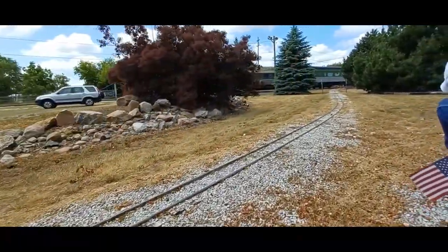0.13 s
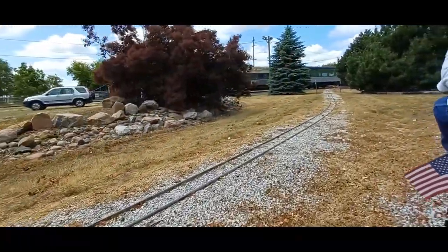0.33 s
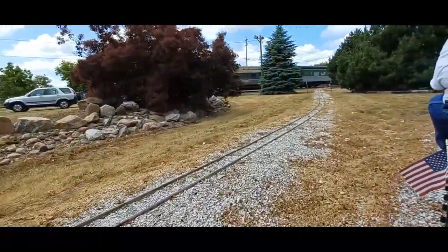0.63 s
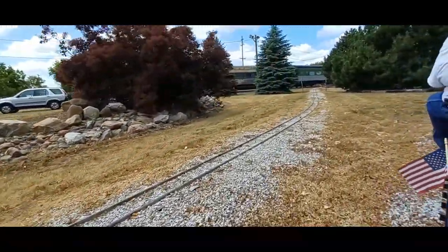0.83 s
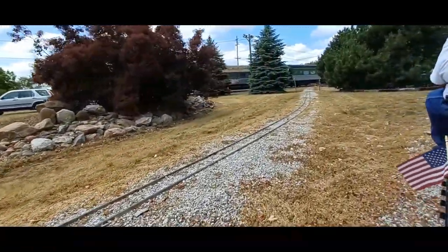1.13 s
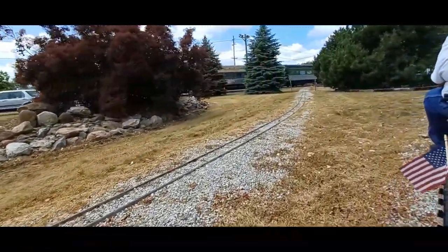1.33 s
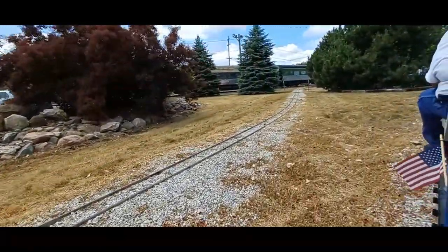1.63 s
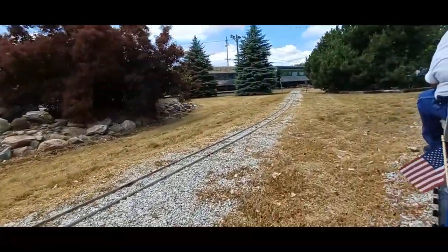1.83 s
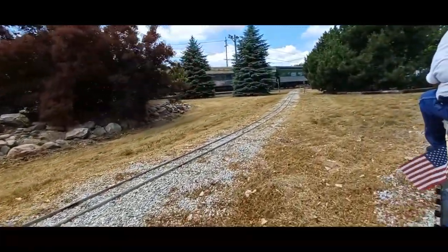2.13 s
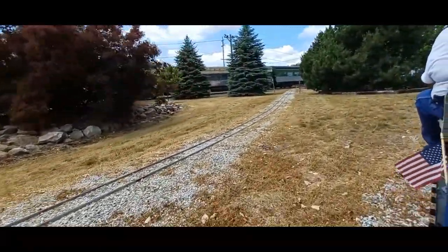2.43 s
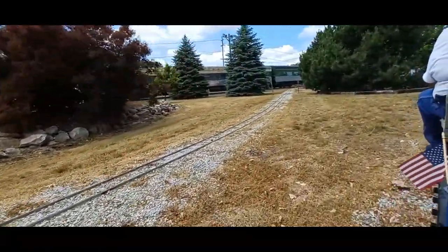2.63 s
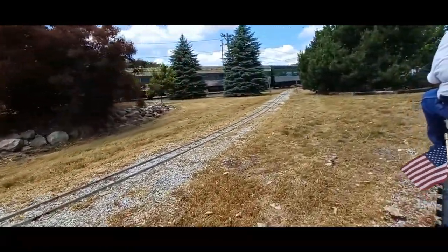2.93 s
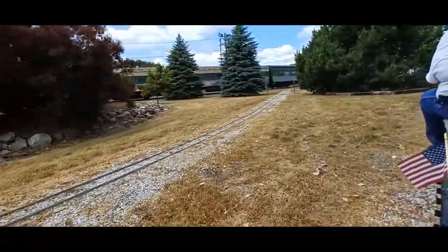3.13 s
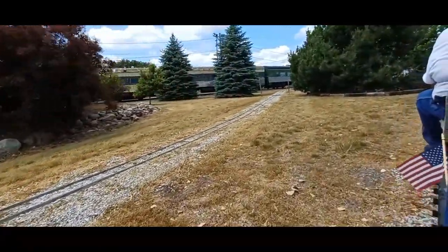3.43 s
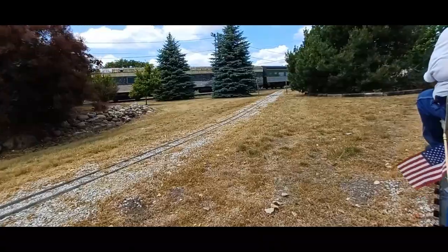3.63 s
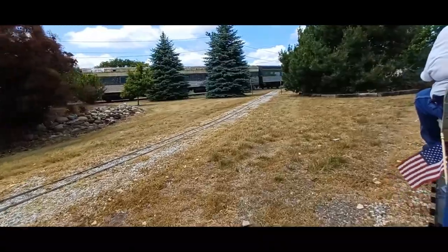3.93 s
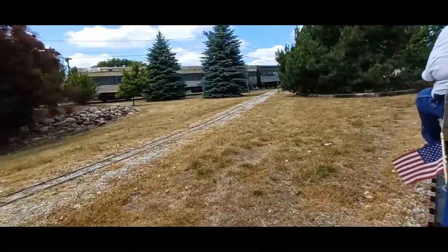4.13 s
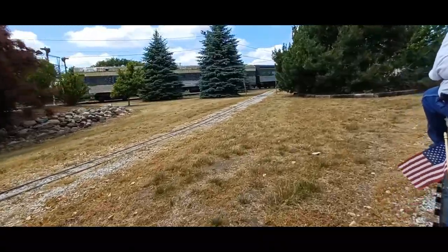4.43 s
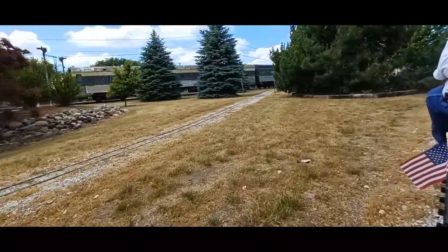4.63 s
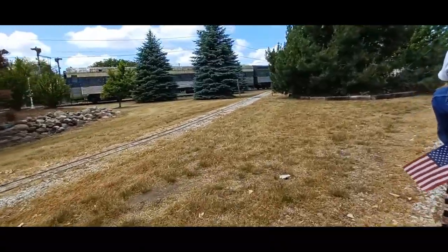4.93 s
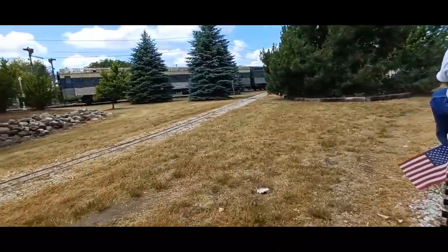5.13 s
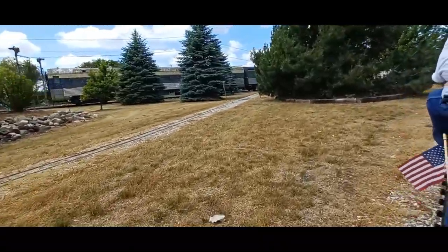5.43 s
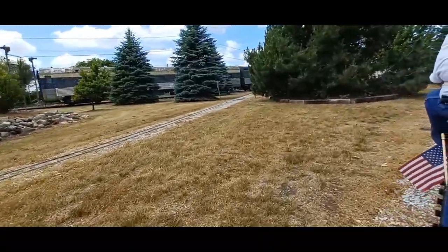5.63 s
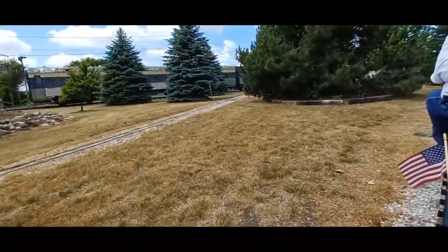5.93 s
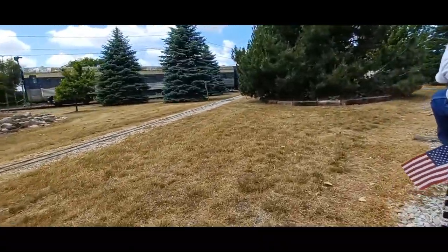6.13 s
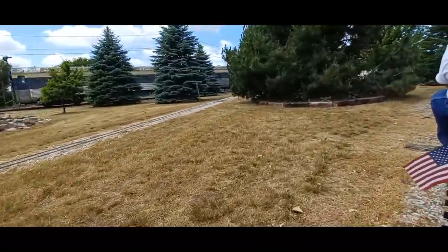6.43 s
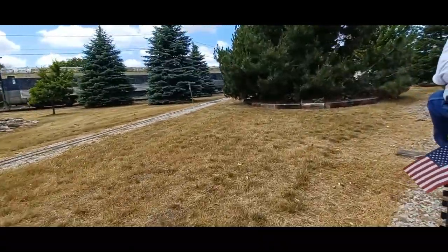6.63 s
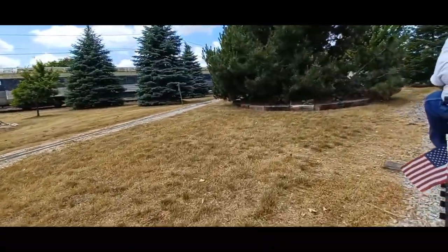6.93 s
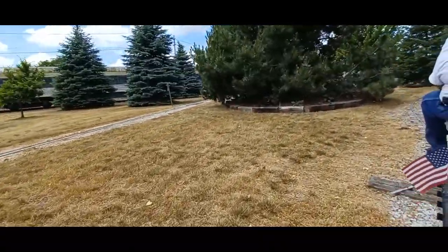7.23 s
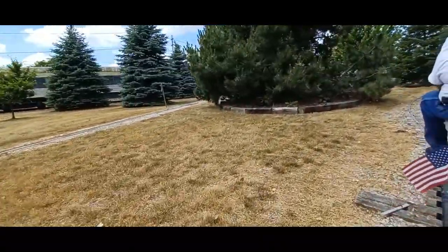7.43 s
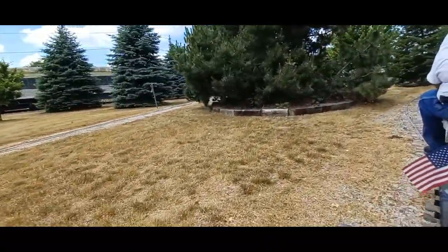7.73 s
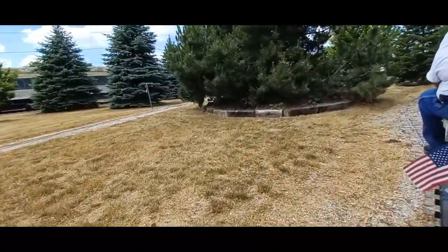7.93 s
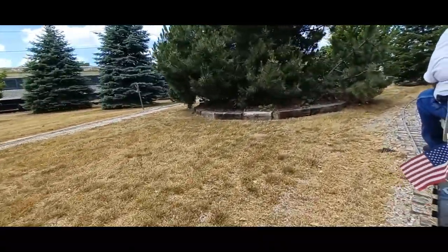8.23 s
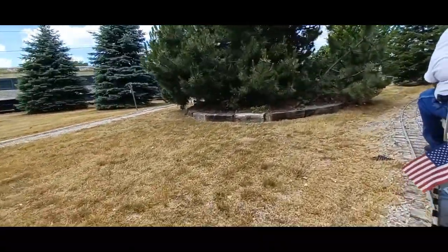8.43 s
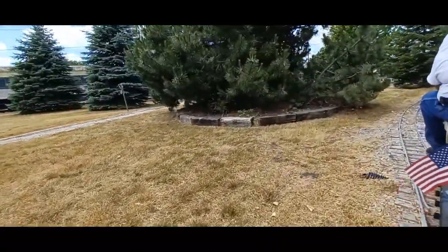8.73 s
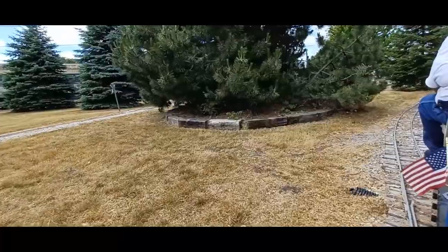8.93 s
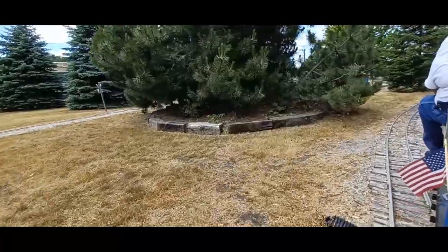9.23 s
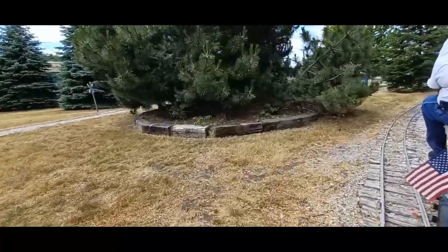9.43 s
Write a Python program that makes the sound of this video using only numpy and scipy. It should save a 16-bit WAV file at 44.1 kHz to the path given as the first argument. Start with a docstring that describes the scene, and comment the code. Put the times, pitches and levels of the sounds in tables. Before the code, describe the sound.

A small one-cylinder engine revs up to a fast sputtering buzz, backfires once, then slows to an uneven chug as a miniature train rolls outdoors.

```python
"""A one-cylinder four-stroke engine pulls a ride-on train across a lawn: it revs, slows and chugs on, often misfiring.
Each cycle the exhaust valve opens with a bang and shuts with a duller thud: two pulses that ring muffler resonances.
Noise bands swelling after the valve events give the shaking body, rattling block and frame and hissing pipe;
narrow resonances of noise give a buzzing panel and a metal part singing near 4 kHz. Wheels roll as a low noise band;
decaying noise bursts are their clacks on rail joints and the clatter and hiss of one backfire near 2.29 s."""
import sys
import numpy as np
from scipy import signal
from scipy.fft import rfft, irfft, next_fast_len
from scipy.io import wavfile

SR = 44100
rng = np.random.default_rng(int(sys.argv[2]) if len(sys.argv) > 2 else 0)


def log_audio(samples):
    """Write samples as a 16-bit WAV file to the path given in sys.argv[1]."""
    # one column per channel
    frames = np.atleast_2d(samples).T
    # limit to full scale, then quantise
    limited = np.clip(frames, -1, 1)
    pcm = np.round(limited * 32767).astype(np.int16)
    wavfile.write(sys.argv[1], SR, pcm)


N = 422478

# weak burns: start_s, cycles (count), bang_share (of a full bang; below 0 the pipe sucks back)
MISFIRES = [(1.24, 1, 0.43), (1.33, 1, 0.16), (2.06, 1, -0.43), (2.25, 2, 0), (2.67, 1, 0.24),
            (2.71, 1, -0.38), (2.92, 2, -0.65), (2.98, 1, 0.21), (3.69, 3, 0.35), (3.98, 1, -0.58),
            (4.02, 1, -0.3), (4.11, 1, -0.27), (4.2, 3, 0.44), (4.54, 1, -0.56), (4.69, 2, 0),
            (4.79, 2, 0.28), (5.46, 1, -0.32), (5.97, 3, -0.03), (6.067, 1, 0.35), (6.26, 1, -0.67),
            (6.55, 1, -0.57), (7.06, 1, -0.22), (7.11, 2, 0.24), (7.2, 1, 0.35), (7.59, 1, -0.45),
            (7.64, 2, 0), (7.74, 3, 0.27), (7.9, 2, -0.43), (8.43, 2, -0.3), (8.85, 1, -0.09),
            (9.22, 1, -0.35), (9.47, 2, -0.09)]


def from_db(db):
    """Decibels to amplitude ratio: 20 dB is a factor of ten."""
    return 10 ** (np.asarray(db) / 20)


def rms_one(x):
    """Normalise the root-mean-square to 1."""
    return x / np.sqrt(np.mean(x ** 2) + 1e-20)


def in_time(rows):
    """Linear interpolation of a curve table: each column becomes one value a sample."""
    s, *columns = np.transpose(rows)
    return [np.interp(np.arange(N) / SR, s, c) for c in columns]


def at_hz(points, hz):
    """Interpolation of a table along a logarithmic frequency axis."""
    table_hz, value = np.transpose(points)
    return np.interp(np.log(hz + 1), np.log(table_hz + 1), value)


def drift(rate_hz):
    """Slow random modulation of spread 1: white noise through a double low-pass pole."""
    step = 40   # samples between the drawn values
    r = np.exp(-2 * np.pi * rate_hz * step / SR)
    settle = 2000
    white = rng.standard_normal(N // step + 2 + settle)
    slow = signal.lfilter([1], [1, -2 * r, r * r], white)[settle:]
    return np.interp(np.arange(N) / step, np.arange(len(slow)), rms_one(slow))


def soften(x, seconds):
    """Two cascaded one-pole low-passes turn a click into a rounded puff."""
    r = np.exp(-1 / (seconds * SR))
    return signal.lfilter([(1 - r) ** 2], [1, -2 * r, r * r], x + 1e-18)


def stereo_noise(spectrum, envelope):
    """Partial coherence: enveloped, coloured noise reaches two microphone ports partly alike, shifted in phase."""
    # pitch_hz, left_right_likeness (0 to 1)
    likeness = [(30, .7), (60, .93), (100, .98), (400, .97), (800, .75), (1500, .55), (2500, .55),
                (4500, .3), (9000, .15)]
    # pitch_hz, left_phase_lead_rad
    left_lead = [(0, 0), (780, -0.2), (1030, 3.6), (1890, 3.6), (2240, 5.3), (2580, 9.4), (3790, 9.4),
                 (4390, 15.1), (4820, 15.6), (6630, 24.5), (8530, 32.3), (11000, 24.9), (14000, 24.2),
                 (15300, 22.2)]
    # pitch_hz, left_above_right_db
    left_gain = [(60, -1.0), (150, -2.0), (380, -2.0), (950, -2.5), (2380, -2.0), (5980, 0.0), (15000, 7.5)]
    size = next_fast_len(N)
    hz = np.arange(size // 2 + 1) * SR / size
    shared, own = rfft(rng.standard_normal((2, N)) * envelope, size)
    alike = np.clip(at_hz(likeness, hz), 0, 1)
    left = alike * shared * np.exp(1j * at_hz(left_lead, hz)) + np.sqrt(1 - alike ** 2) * own
    left = left * from_db(at_hz(left_gain, hz))
    inside = (hz > spectrum[0][0]) & (hz < spectrum[-1][0])
    colour = from_db(at_hz(spectrum, hz)) * inside
    return irfft(np.array([left, shared]) * colour, size)[:, :N] / np.sqrt(np.mean(colour ** 2))


def throb(bang, thud, depth, seconds, patchy_db):
    """Amplitude modulation: an envelope of rms 1 swells after every valve event and wavers by itself."""
    swell = rms_one(soften(np.abs(bang) + 1.3 * thud, seconds))
    return rms_one((1 + depth * swell) * from_db(patchy_db * (drift(25) + drift(30))))


def resonant_noise(envelope, hz, width_hz):
    """Narrow-band resonance: noise passes twice through one two-pole filter; rms 1."""
    r = np.exp(-np.pi * width_hz / SR)
    x = rng.standard_normal((2, N)) * envelope
    for _ in range(2):
        x = signal.lfilter([1, 0, -1], [1, -2 * r * np.cos(2 * np.pi * hz / SR), r * r], x)
    return rms_one(x)


def wheel_rolling():
    """Rolling contact: wheels on the rails, felt through the car as a drifting low noise band."""
    # pitch_hz, density_db (per Hz, relative)
    rolling_spectrum = [(20, -14), (35, -7.5), (55, -1), (80, -1), (120, -14)]
    return stereo_noise(rolling_spectrum, from_db(-52 + 2.0 * drift(3)))


def joint_and_backfire_bursts():
    """Transient excitation: each rail joint, and the backfire near 2.29 s, starts a tick and a dying burst of noise."""
    # rail joints, and the backfire in the 2.287 and 2.305 s rows; levels of the burst, the tick comes on top:
    # start_s, clack_db, t60_s, low_thump_db, treble_db (jingle of a joint, hiss of the backfire)
    burst_rows = [(0.012, -40.5, 0.095, -42, -51.5), (0.164, -46, 0.088, -53, -61),
                  (2.287, -42.5, 0.32, -45, -44.5), (2.305, -47.5, 0.25, -49.5, -53),
                  (4.034, -44, 0.098, -48.5, -63.5), (4.231, -58, 0.097, -51.5, -75.5),
                  (4.9, -48, 0.064, -50.5, -71), (5.8212, -53.5, 0.063, -47, -70),
                  (6.439, -55.5, 0.11, -45.5, -71), (8.08, -53, 0.1, -46.5, -60),
                  (8.311, -45.5, .06, -47.5, -61.5), (8.736, -48, 0.35, -33, -65),
                  (8.746, -47.5, 0.13, -42.5, -64), (8.995, -46.5, .12, -40, -75),
                  (9.1081, -39.5, 0.25, -35.5, -71), (9.133, -49.5, 0.06, -41, -70),
                  (9.225, -45.5, 0.14, -37.5, -77), (9.236, -50.5, 0.058, -43, -62.5),
                  (9.349, -41, 0.12, -37, -74), (9.356, -45.5, 0.074, -33.5, -69),
                  (9.419, -51.5, 0.084, -45.5, -69), (9.478, -42, 0.071, -39.5, -77.5),
                  (9.5658, -40, 0.1, -40.5, -58)]
    tick_s = 0.0042   # time constant
    tick_shares = np.array([2, 1.0, .2])[:, None]   # tick over burst in clack, thump, treble
    t, envelopes = np.arange(N) / SR, np.zeros((3, N))
    for s, clack_db, t60, thump_db, treble_db in burst_rows:
        since = np.maximum(t - s, 0)
        burst = (t > s) * from_db(-60 * since / t60)
        tick = (t > s) * np.exp(-since / tick_s)
        envelopes += from_db([[clack_db], [thump_db], [treble_db]]) * (burst + tick_shares * tick)
    return envelopes


def clacks(clack):
    """Impulsive radiation: the clack envelopes of joints and backfire shape a broad band of noise."""
    # pitch_hz, density_db (per Hz, relative)
    clack_spectrum = [(290, -40), (500, -24.5), (803, -11.5), (1410, -6.5), (1800, 0.5), (2430, -1),
                      (2760, -0.5), (7890, -21.5), (15500, -44.5)]
    return stereo_noise(clack_spectrum, clack)


def body_hum(bang, thud, load_db, faster):
    """Forced vibration: the engine shakes the car body, which hums as low noise following the load."""
    # pitch_hz, density_db (per Hz, relative)
    hum_spectrum = [(30, -50), (70, -22), (120, -6), (230, 0), (330, -10), (450, -30)]
    level_db = load_db - 31 - .45 * faster   # relative to the bang
    shaking = throb(bang, thud, depth=0.1, seconds=0.031, patchy_db=1.0)
    return stereo_noise(hum_spectrum, from_db(level_db) * shaking)


def frame_rumble(bang, thud, thump, shake_db, faster):
    """Structure-borne sound: engine shaking and the thumps of joints and backfire share one low band."""
    # pitch_hz, density_db (per Hz, relative)
    rumble_spectrum = [(300, -12), (400, -6), (530, -8), (790, -9), (940, -20), (1400, -28)]
    level_db = -38.5 + 0.75 * shake_db - 0.4 * faster   # at mean shaking and 20 firings per s: -38.5
    throbbing = throb(bang, thud, depth=0.11, seconds=0.00039, patchy_db=0.23)
    return stereo_noise(rumble_spectrum, thump + from_db(level_db) * throbbing)


def block_rattle(bang, thud, rattle_db):
    """Vibration-driven contact noise: block and frame rattle with a swell after each valve event."""
    # pitch_hz, density_db (per Hz, relative)
    rattle_spectrum = [(530, -44), (900, -9), (977, -4), (1260, -8), (1370, -10), (1740, -11),
                       (2070, -12.5), (2500, -14.5), (2800, -13.5), (3150, -20.5), (3750, -19),
                       (4260, -18.5), (6850, -32), (8000, -44.5), (10400, -57), (17600, -120)]
    throbbing = throb(bang, thud, depth=0.17, seconds=0.0029, patchy_db=0.71)
    return stereo_noise(rattle_spectrum, from_db(rattle_db) * throbbing)


def panel_buzz(bang, thud, rattle_db):
    """Panel resonance: a band near 2 kHz buzzes along with the rattle, its level drifting."""
    throbbing = throb(bang, thud, depth=0.33, seconds=0.003, patchy_db=1.0)
    level_db = rattle_db - 11.5 + 2.2 * drift(2.5)
    return from_db(level_db) * resonant_noise(throbbing, hz=2010, width_hz=210)


def metal_singing(bang, thud):
    """Lightly driven resonance: a metal part sings near 4 kHz, coming and going."""
    # start_s, level_db
    singing_level = [(0.0, -77), (0.3, -62), (0.4, -49), (0.62, -47.5), (0.78, -67), (2.0, -71.5),
                     (3.7, -80), (4.11, -52.5), (4.67, -61.5), (5.1, -60.5), (5.89, -50), (6.8, -54.5),
                     (6.96, -69), (7.15, -50.5), (7.66, -54), (7.92, -81), (8.7, -79.5), (9.58, -73)]
    (level_db,) = in_time(singing_level)
    throbbing = throb(bang, thud, depth=0.37, seconds=0.0044, patchy_db=1.4)
    return from_db(level_db) * resonant_noise(throbbing, hz=4200, width_hz=480)


def gas_hiss(bang, thud, treble, shake_db, push_db, faster):
    """Turbulent jet noise: gas hisses from the pipe, pulsing deeper under load; the bursts' treble shares its band."""
    # pitch_hz, density_db (per Hz, relative)
    hiss_spectrum = [(3820, -30), (5000, -1), (6500, -6.5), (6970, -8.5), (7980, -17), (9520, -16),
                     (12900, -12), (15600, -14.5)]
    level_db = -59.5 + 0.98 * shake_db + 0.34 * faster + 0.78 * push_db
    throbbing = throb(bang, thud, depth=0.23 * from_db(1.5 * push_db), seconds=.004, patchy_db=0.4)
    return stereo_noise(hiss_spectrum, treble + from_db(level_db) * throbbing)


def engine_speed():
    """Flywheel inertia: firings per s sag at every weak burn and recover exponentially."""
    # start_s, throttle_speed (firings per s)
    throttle = [(0.0, 14.389), (0.25, 15.71), (0.48, 21.878), (0.71, 28.05), (1.0, 31.092), (1.39, 35.175),
                (1.7, 34.585), (2.03, 34.125), (2.37, 31.305), (2.75, 30.169), (3.13, 28.811),
                (3.4, 27.288), (3.89, 25.21), (4.31, 21.522), (4.47, 22.062), (4.97, 20.071), (5.4, 20.987),
                (5.79, 22.029), (6.2, 21.958), (6.6, 21.868), (6.92, 22.547), (7.3, 21.755), (7.71, 20.803),
                (8.05, 19.305), (8.4, 17.469), (8.85, 17.694), (9.2, 16.163), (9.58, 17.275)]
    sag_per_miss, recovery_s = .6, .3   # firings per s lost to a missed burn; time constant
    t, (asked,) = np.arange(N) / SR, in_time(throttle)
    missed = np.zeros(N)
    for s, cycles, share in MISFIRES:
        rate = asked[int(s * SR)]
        missed += (1 - max(share, 0)) * rate * ((t > s) & (t < s + cycles / rate))
    sag = signal.lfilter([1 / SR], [1, -np.exp(-1 / (recovery_s * SR))], missed)
    return asked - sag_per_miss * sag


def valve_clicks(speed):
    """Four-stroke timing: the exhaust valve opens and shuts once a cycle, each giving one impulse."""
    first_firing_s = .0172
    backfire_s, backfire_share = 2.2832, 2.0   # unburnt gas goes off in the pipe; share of a full bang
    t = np.arange(N) / SR
    turns = np.cumsum(speed) / SR
    turns = turns - turns[round(first_firing_s * SR)]
    cycle = np.arange(int(turns[-1]) + 1)
    chance = rng.standard_normal((len(cycle), 4))
    opens = np.interp(cycle, turns, t)
    burn = np.ones(len(cycle))
    for s, cycles, share in MISFIRES:
        first = np.argmin(np.abs(opens - s))
        burn[first:first + int(cycles)] = share
    # after a weak burn the valve's thud comes sooner and louder
    shuts = np.interp(cycle + .3 - .03 * (1 - burn), turns, t) + .0028 + .00005 * chance[:, 1]
    # burns differ in strength, more so above 31.5 firings per s
    uneven_db = .5 + np.interp(np.interp(opens, t, speed), [31.5, 33], [0, .7])
    bang, thud = np.zeros((2, N))
    bang_at = ((opens + .00004 * chance[:, 0]) * SR).astype(int)
    bang[bang_at] = burn * from_db(uneven_db * chance[:, 2])
    heard = shuts < t[-1]
    thud_gain = from_db(uneven_db * chance[:, 3] / 2 + 2.6 * (1 - burn))
    thud[(shuts[heard] * SR).astype(int)] = thud_gain[heard]
    bang[int(backfire_s * SR)] = backfire_share
    # the blast swallows most of a thud in the next 15 ms
    thud[int(backfire_s * SR):int((backfire_s + .015) * SR)] *= .3
    return bang, thud


def exhaust(bang, thud, faster):
    """Modal synthesis: bang and softer thud ring muffler and pipe; the open end radiates no deep bass."""
    # pitch_hz, t60_s, bang_share, thud_share (signed, before the gains that follow speed)
    muffler_modes = [(104, .04, -.7, .08), (159, .02, 1.4, .2), (215, .058, .85, .58),
                     (239, .28, -.04, .17), (256.6, .042, -1.3, -.14), (328.6, .045, -.38, -.09),
                     (386, .07, .15, .11), (437.5, .04, .2, -.06), (480, .07, .04, -.01),
                     (660, .035, -.23, .01), (792, .045, .2, .011), (890, .03, -.14, .01)]
    opening, shutting = soften(bang, .0007), soften(thud, .0008)
    # gas flow keeps the long-ringing mode humming unsteadily
    flow = from_db(-58 + .75 * faster + 1.2 * drift(8.6)) * rng.standard_normal(N)
    out = 0
    for hz, t60, in_bang, in_thud in muffler_modes:
        r, w = from_db(-60 / (t60 * SR)), 2 * np.pi * hz / SR
        # the bang strikes the upper modes harder as speed rises
        crack = from_db((1.0 + 0.5 * faster) * (hz > 720))
        strike = in_bang * opening * crack + in_thud * shutting
        # the lowest mode booms more with speed; every mode's strength drifts a little
        strike = strike * from_db(0.0351 * faster * (hz < 140) + .15 * drift(6))
        driven = strike + flow * (t60 > .17)
        out = out + signal.lfilter([0, np.sin(w)], [1, -2 * r * np.cos(w), r * r], driven)
    out = signal.sosfilt(signal.butter(4, 92.0, "high", fs=SR, output="sos"), out)
    # the deep bass thins out from 1.1 to 19 firings per s above 20
    thin = np.clip((faster - 1.1) / (19 - 1.1), 0, 1)
    thinned = signal.sosfilt(signal.butter(2, 99, "high", fs=SR, output="sos"), out)
    return out + thin * (thinned - out)


def scene():
    """Superposition: the exhaust sits a little to the right by delay and level, most noise is spread wide."""
    # start_s, bang_db, thud_db: load on the engine
    load_curve = [(0.0, 3.5, 1), (0.36, 5, 0), (0.5, 6.5, 5), (0.95, 3.5, 10.5), (1.05, 1, 4.5),
                  (1.3, 4.5, 5.5), (1.8, 2, 7), (2.1, 3, 6.5), (2.24, 0, 4.5), (2.4, -0.5, 5.5),
                  (2.75, 4, 4.5), (3.0, 2, 2.5), (3.3, -0.5, 5), (3.6, 0.5, 3), (3.9, 1.5, 2),
                  (4.4, -0.5, -1.5), (5.1, 1.5, -0.5), (5.45, 3.5, 1.5), (5.75, 3, 5), (6.1, 2, 2),
                  (6.7, 3, -1), (6.9, 3, 4), (7.3, 1.5, 2), (8.0, 1.5, -2), (8.7, 1.5, 0), (9.58, 2, -0.5)]
    # start_s, rattle_db: how hard block and frame shake
    shaking_curve = [(0.0, -40), (0.21, -42.5), (0.51, -35.5), (0.82, -41), (1.1, -38), (1.97, -39.5),
                     (2.5, -41), (3.68, -43.5), (4.1, -44), (4.7, -45.5), (5.89, -41), (6.3, -42.5),
                     (7.0, -39.5), (7.9, -41.5), (8.6, -40.5), (9.58, -38)]
    speed = engine_speed()
    bang, thud = valve_clicks(speed)
    (load_db, thud_db), (rattle_db,) = in_time(load_curve), in_time(shaking_curve)
    faster = speed - 20   # firings per s above 20
    shake_db, push_db = rattle_db - rattle_db.mean(), load_db - load_db.mean()
    clack, thump, treble = joint_and_backfire_bursts()
    pipe = exhaust(from_db(load_db) * bang, from_db(thud_db) * thud, faster)
    # the left port is farther: 6.5 samples later and 2.2 dB weaker
    left = from_db(-2.2) * np.interp(np.arange(N) - 6.5, np.arange(N), pipe)
    mix = np.array([left, pipe]) + wheel_rolling() + clacks(clack)
    mix += body_hum(bang, thud, load_db, faster)
    mix += frame_rumble(bang, thud, thump, shake_db, faster)
    mix += block_rattle(bang, thud, rattle_db) + panel_buzz(bang, thud, rattle_db)
    mix += metal_singing(bang, thud)
    return mix + gas_hiss(bang, thud, treble, shake_db, push_db, faster)


def record(dry):
    """Soft saturation and band limiting: peaks are lightly rounded, the deep bass and the top are cut."""
    rounded = 1.25 * np.tanh(dry / 1.25)
    rounded = signal.sosfilt(signal.butter(3, 48, "high", fs=SR, output="sos"), rounded)
    return signal.sosfilt(signal.cheby2(24, 80, 15830, fs=SR, output="sos"), rounded)


dry = scene()
out = record(dry)
log_audio(out)
```